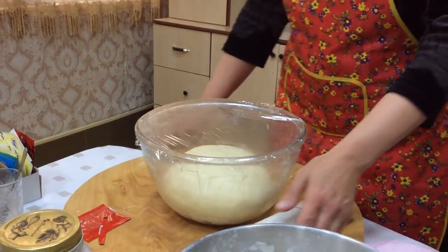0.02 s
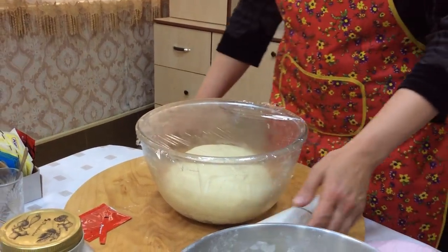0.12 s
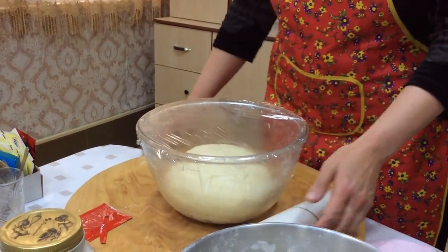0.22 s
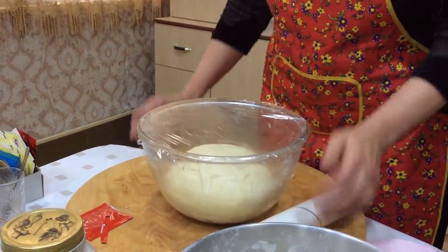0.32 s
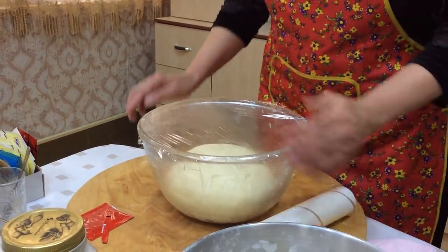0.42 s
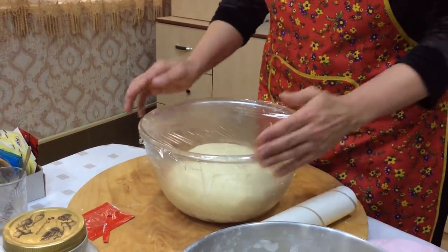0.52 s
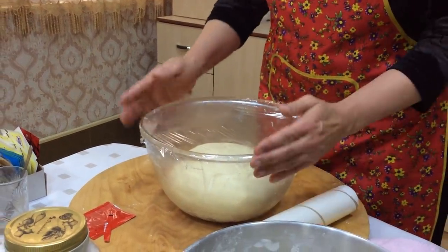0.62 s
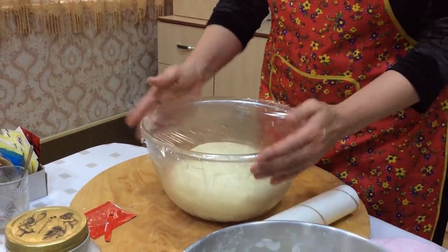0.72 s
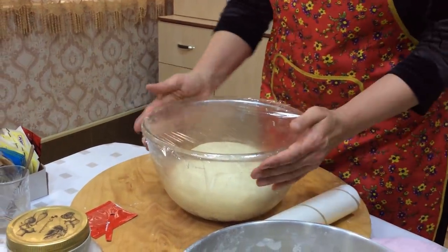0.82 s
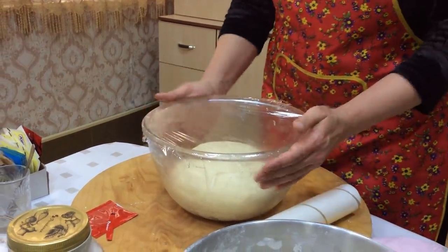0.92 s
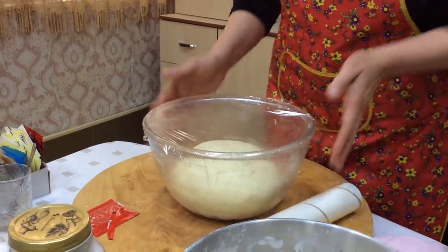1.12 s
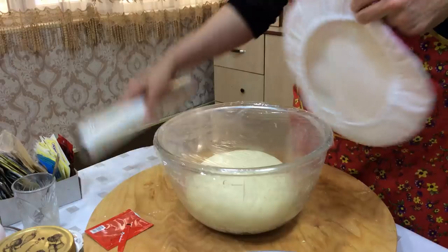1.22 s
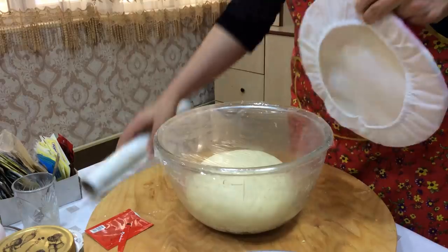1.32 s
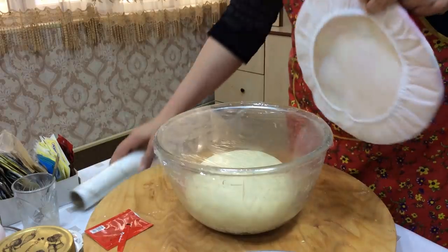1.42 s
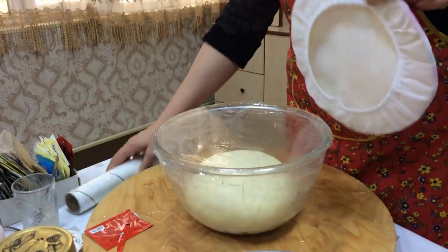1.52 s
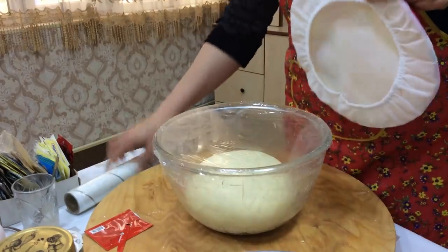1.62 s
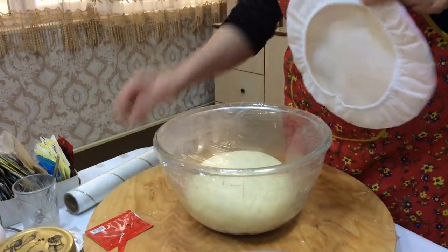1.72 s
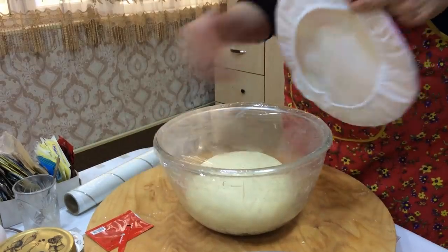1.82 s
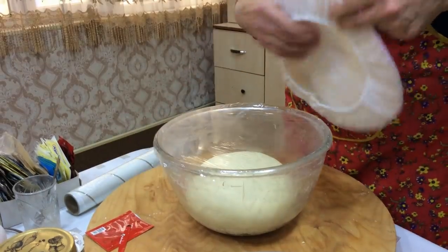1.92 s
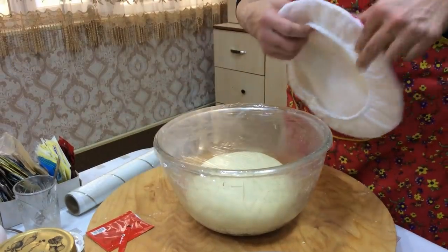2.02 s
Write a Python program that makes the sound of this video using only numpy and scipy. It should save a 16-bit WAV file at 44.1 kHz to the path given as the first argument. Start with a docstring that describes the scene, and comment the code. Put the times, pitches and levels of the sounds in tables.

```python
"""Cling film in a small kitchen

A roll of cling film is let go on a wooden board, then palms smooth the film down round a glass bowl.
After a brief dropout the roll is laid on the cloth-covered table with dull knocks, while sleeves rustle.
Knocks are contact forces that ring damped modes; film and cloth are coloured noise under bell-shaped levels.
A low mains hum and faint hiss lie underneath."""
import sys
import numpy as np
from scipy import signal
from scipy.fft import rfft, irfft
from scipy.io import wavfile
from scipy.ndimage import uniform_filter1d

SR = 44100
rng = np.random.default_rng(int(sys.argv[2]) if len(sys.argv) > 2 else 0)


def store_wav(level_fs):
    """Save 16-bit WAV to argv[1]."""
    pcm = np.round(np.clip(np.atleast_2d(level_fs), -1, 1) * 32767)
    wavfile.write(sys.argv[1], SR, pcm.T.astype(np.int16))


N = 90405


def from_db(db):
    """A level in decibels is twenty times the logarithm of an amplitude ratio; return that ratio."""
    return 10 ** (np.asarray(db) / 20)


def rms_one(x):
    """Mean power is the mean square; scale it to one."""
    return x / np.sqrt(np.mean(x ** 2) + 1e-20)


def seconds():
    """Uniform sampling: the time of every sample."""
    return np.arange(N) / SR


def decay(t, t60):
    """Exponential decay: the amplitude falls by 60 dB in t60 seconds."""
    return np.exp(-np.log(1000) * t / t60)


def at_hz(points, hz):
    """Pitch is logarithmic: interpolate a table on a log-frequency axis."""
    table_hz, values = np.array(points).T
    return np.interp(np.log(hz + 1), np.log(table_hz), values)


def colour(x, spectrum):
    """Spectral shaping: weight each frequency of a signal, then scale to unit power."""
    gain = from_db(at_hz(spectrum, np.fft.rfftfreq(N, 1 / SR)))
    return rms_one(irfft(rfft(x) * gain, N))


def lowpass(x, hz):
    """Four-pole low-pass: components above the cut-off fall by 24 dB per octave."""
    sections = signal.butter(4, min(hz, SR / 2 - 1000), fs=SR, output="sos")
    return signal.sosfilt(sections, x + 1e-18)


def highpass(x, hz):
    """Two-pole high-pass: components below the cut-off fall by 12 dB per octave."""
    return signal.sosfilt(signal.butter(2, hz, "high", fs=SR, output="sos"), x)


def ring(x, hz, t60):
    """Damped resonance: a unit click sets a decaying sine of initial height 1 ringing."""
    radius = decay(1 / SR, t60)
    angle = 2 * np.pi * hz / SR
    return signal.lfilter([0, np.sin(angle)], [1, -2 * radius * np.cos(angle), radius ** 2], x + 1e-18)


def swells(rows):
    """Incoherent sources add in power: overlapping bells, each with its own rise and fall."""
    t = seconds()
    power = 0
    for peak_s, db, rise_s, fall_s in rows:
        width = np.where(t < peak_s, rise_s, fall_s)
        power = power + from_db(db) ** 2 * np.exp(-((t - peak_s) / width) ** 2)
    return np.sqrt(power)


def burst(x, t60):
    """Dense mode overlap: every impulse becomes a short dying burst of noise."""
    return signal.fftconvolve(x, rng.standard_normal(N) * decay(seconds(), t60))[:N]


def radiate(x):
    """Bending waves are dispersive, highs arriving first, and small bodies radiate little deep bass."""
    bend_delay_s = 0.0012  # travel time at 1 kHz; it grows as one over the root of frequency
    hz = np.fft.rfftfreq(2 * N, 1 / SR)
    phase = np.exp(-4j * np.pi * bend_delay_s * np.sqrt(1000 * hz))
    spread = irfft(rfft(x, 2 * N) * phase)[:N]
    return highpass(spread, hz=157)


def kitchen():
    """Diffuse reverberation: noise bands, strongest in the bass, build up and decay exponentially."""
    # reverberation time of the room: f/Hz, t60/s
    room_t60 = [(100, 0.28), (400, 0.46), (800, 0.47), (1600, 0.35), (3000, 0.41), (10000, 0.51)]
    # relative strength of the echo: f/Hz, level/dB
    room_gain = [(60, 11), (110, 14.5), (180, 1.5), (400, -2), (800, -2.5), (1700, 3), (2800, -6),
                 (8000, -11)]
    delay_s, build_s = 0.01, 0.0054
    build_cycles = 0.52  # added build-up, longest in the bass
    t = np.maximum(seconds()[:SR] - delay_s, 0)
    edges = np.geomspace(45, 16000, 18)  # about half an octave apart, Hz
    echo = 0
    for low, high in zip(edges, edges[1:]):
        centre = np.sqrt(low * high)
        sections = signal.butter(2, [low, high], "band", fs=SR, output="sos")
        band = signal.sosfilt(sections, rng.standard_normal(2 * SR))[SR:]  # settled half
        build_up = 1 - np.exp(-t / (build_s + build_cycles / low))
        band = rms_one(band * build_up * decay(t, at_hz(room_t60, centre)))
        # wider bands carry more power
        echo = echo + from_db(at_hz(room_gain, centre)) * band * np.sqrt(2 * (high - low)) / SR
    return echo


def knocks(hits, modes, crack_db, tick_db, room_db):
    """Impact excitation: contacts, each with its own cut-off, drive modes, crack, tick and room echo."""
    force, hard = 0, 0
    for hit_s, db, cutoff_hz in hits:
        click = from_db(db) * (np.arange(N) == int(hit_s * SR))
        force = force + lowpass(click, cutoff_hz)
        hard = hard + click * cutoff_hz / 1000  # harder contacts tick more
    body = sum(from_db(db) * ring(force, hz, t60) for hz, db, t60 in modes)
    crack = from_db(crack_db) * burst(force, t60=0.052)
    tick = from_db(tick_db) * burst(hard, t60=0.037)
    direct = radiate(body + crack + tick)
    return direct + from_db(room_db) * signal.fftconvolve(direct, kitchen())[:N]


def background():
    """Stationary noise and a tone: coloured room noise and a slightly wavering mains hum."""
    # room noise spectrum: f/Hz, relative level per Hz/dB
    air = [(15, -62), (25, -50), (48, -0.5), (69, -9.5), (113, 0.5), (152, -4.5), (433, -9), (509, -14),
           (648, -19), (1800, -29.5), (2920, -30), (4750, -30.5), (5280, -33.5), (14300, -33.5),
           (15500, -50)]
    air_db, hum_db = -53, -50.5
    hum_hz, hum_waver = 99.6, 0.057  # waver: rms share of the hum's height
    waver = 1 + hum_waver * rms_one(lowpass(rng.standard_normal(N), hz=1.7))
    hum = np.sqrt(2) * np.sin(2 * np.pi * hum_hz * seconds()) * waver
    return from_db(air_db) * colour(rng.standard_normal(N), air) + from_db(hum_db) * hum


def finger_taps():
    """Modal ringing of a tube: light finger taps on the roll sound its cardboard core."""
    # taps: t/s, strength/dB, contact cut-off f/Hz
    taps = [(0.0636, -0.5, 4250), (0.0675, 0.5, 900), (0.1075, -8, 7700), (0.1305, -20, 5000),
            (2.0205, -13, 2200)]
    # modes of the cardboard tube: f/Hz, level/dB, t60/s
    tube_modes = [(241, -47, 0.18), (542, -42.5, 0.2), (616, -36.5, 0.079), (900, -44.5, 0.021),
                  (1100, -48.5, 0.07), (1472, -41.5, 0.03), (2035, -45, 0.032), (2740, -39, 0.019),
                  (4850, -52, 0.0094)]
    return knocks(taps, tube_modes, crack_db=-41, tick_db=-61.5, room_db=-2.5)


def cloth_rustle():
    """Fibre friction is broadband noise: sleeves and apron rustle as the arms move."""
    # rustles: peak t/s, level/dB, rise t/s, fall t/s
    rustles = [(0.11, -54.5, 0.012, 0.22), (0.255, -46.5, 0.005, 0.019), (0.44, -56.5, 0.019, 0.12),
               (1.305, -55.5, 0.028, 0.035), (1.39, -61, 0.021, 0.048), (1.56, -56, 0.035, 0.087),
               (1.69, -52.5, .04, 0.083), (1.89, -58, .03, 0.075), (2.03, -50.5, 0.011, 0.038)]
    # cloth spectrum: f/Hz, relative level per Hz/dB
    cloth = [(300, 16.5), (1000, 4.5), (2000, 2), (3100, 0), (4500, -4.5), (8000, -5.5), (15500, -9)]
    return swells(rustles) * colour(rng.standard_normal(N), cloth)


def roll_on_board():
    """Modal ringing of coupled bodies: the roll knocks on the wooden board and both ring."""
    # knocks: t/s, strength/dB, contact cut-off f/Hz
    board_hits = [(0.2092, -1, 3060), (0.2136, 0, 2220), (0.2240, -7.5, 1610)]
    # modes of roll and board: f/Hz, level/dB, t60/s
    board_modes = [(254, -43, 0.046), (333, -33, 0.2), (404, -27, 0.11), (489, -33, 0.098),
                   (636, -30.5, 0.075), (712, -17.5, .058), (780.5, -21.5, 0.1), (882, -29, 0.071),
                   (993, -16.5, 0.032), (1092, -34, 0.088), (1154, -29, 0.034), (1194, -27, 0.086),
                   (1420, -32, 0.075), (1623, -33, .09), (1890, -36, 0.064), (2076, -34, 0.035),
                   (2502, -23.5, 0.013)]
    return knocks(board_hits, board_modes, crack_db=-25.5, tick_db=-53.5, room_db=-4)


def film():
    """Stick-slip friction: skin on film hisses in tiny slips that faintly ring the glass beneath."""
    # palm strokes: peak t/s, level/dB, rise t/s, fall t/s
    strokes = [(0.64, -54, 0.012, 0.011), (0.695, -56, 0.033, 0.023), (0.855, -48, 0.029, 0.034),
               (0.99, -53.5, 0.051, 0.046), (1.06, -51.5, 0.035, 0.074), (1.34, -60.5, 0.08, 0.092),
               (2.033, -54, 0.013, 0.022)]
    # film hiss spectrum: f/Hz, relative level per Hz/dB
    film_spectrum = [(400, -9), (850, -35), (1400, -23), (2500, -6), (4000, -2), (5700, -0.5), (8500, 3),
                     (12000, 1), (15500, 2)]
    # modes of the rubbed glass: f/Hz, level/dB
    bowl_modes = [(1015, -23), (1500, -25.5), (1935, -20), (3070, -16.5), (5700, -17), (7990, -18.5),
                  (9010, -21), (12790, -17)]
    slips_per_s, slip_share = 2500, 0.55
    bowl_t60_s = 0.085
    grip_hz, grip_db = 61, 1.5  # the palms' grip flutters: cut-off, rms depth
    slips = rms_one(rng.standard_normal(N) * (rng.random(N) < slips_per_s / SR))
    friction = rng.standard_normal(N) + slip_share * slips
    glass = sum(from_db(db) * rms_one(ring(friction, hz, bowl_t60_s)) for hz, db in bowl_modes)
    grip = from_db(grip_db * rms_one(lowpass(rng.standard_normal(N), grip_hz)))
    return swells(strokes) * grip * (colour(friction, film_spectrum) + glass)


def roll_slip():
    """Resonance-filtered friction: the roll slips once in the hand, a short band of noise."""
    hz, t60_s = 5200, 0.0013
    peak_s, level_db, rise_s, fall_s = 1.368, -59.5, 0.008, 0.042
    noise = ring(ring(rng.standard_normal(N), hz, t60_s), hz, t60_s)
    return swells([(peak_s, level_db, rise_s, fall_s)]) * rms_one(noise)


def roll_on_table():
    """Soft contacts excite few highs: one end judders down on the tablecloth, then the other drops."""
    # knocks: t/s, strength/dB, contact cut-off f/Hz
    table_hits = [(1.5515, -1.5, 280), (1.5650, -18, 262), (1.5785, -22, 260), (1.5915, -13, 240),
                  (1.6045, -18, 221), (1.6568, -3.5, 835), (1.6662, -4.5, 830), (1.6692, -3, 780)]
    # modes of roll and table: f/Hz, level/dB, t60/s
    table_modes = [(91, -55, .08), (170.6, -29.5, 0.22), (240, -27, 0.083), (296, -34.5, 0.15),
                   (388.7, -20.5, 0.06), (493, -24, 0.074), (565, -24.5, 0.023), (674, -19, 0.035),
                   (784, -26, 0.06), (913, -35, .07)]
    return knocks(table_hits, table_modes, crack_db=-41, tick_db=-47, room_db=-6)


def scene():
    """Superposition: the pressures of all sources add at one microphone."""
    impacts = finger_taps() + roll_on_board() + roll_on_table()
    rubbing = cloth_rustle() + film() + roll_slip()
    return (background() + impacts + rubbing)[None]


def record(dry):
    """Gating and band limiting: a brief dropout leaves only a trace of bass; the top is cut."""
    dropout_s, dropout_end_s, dropout_db = 1.235, 1.281, -36
    cutoff_hz = 15450
    t = seconds()
    gap = ((t > dropout_s) & (t < dropout_end_s)) * 1.0
    gap = uniform_filter1d(gap, size=128)  # short crossfades
    trace = from_db(dropout_db) * lowpass(dry, hz=300)
    x = dry * (1 - gap) + gap * trace
    return signal.sosfilt(signal.ellip(10, 0.2, 70, cutoff_hz, fs=SR, output="sos"), x)


dry = scene()
out = record(dry)
store_wav(out)
```